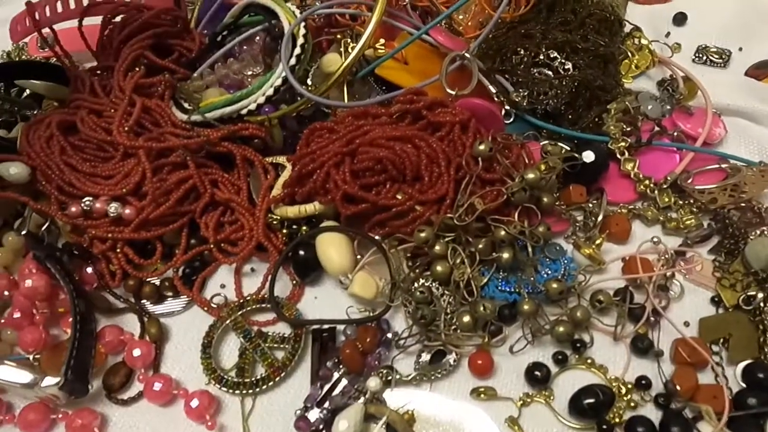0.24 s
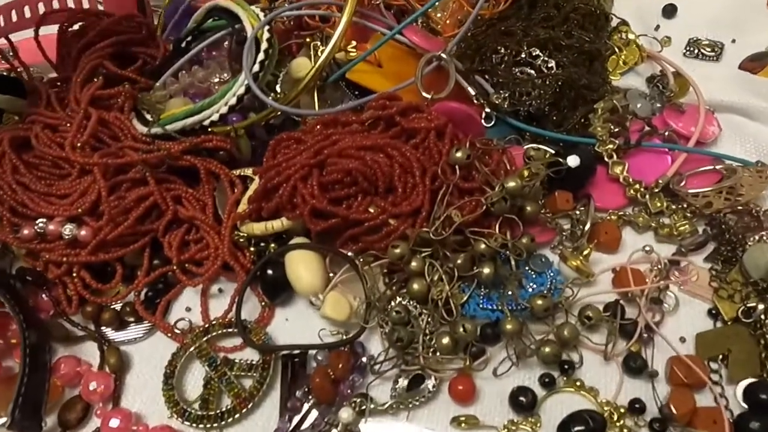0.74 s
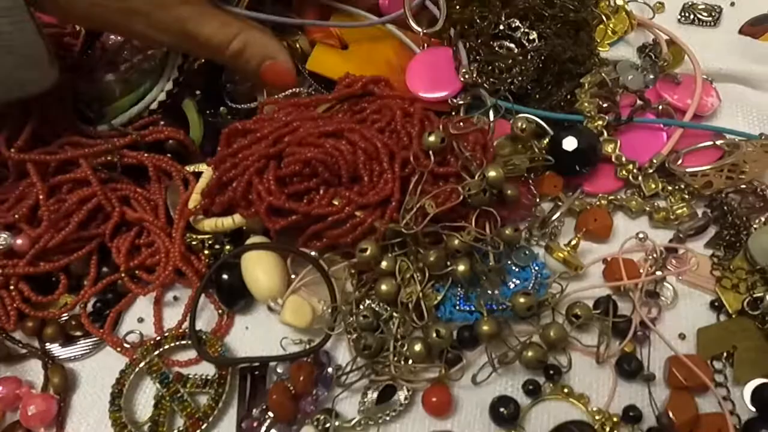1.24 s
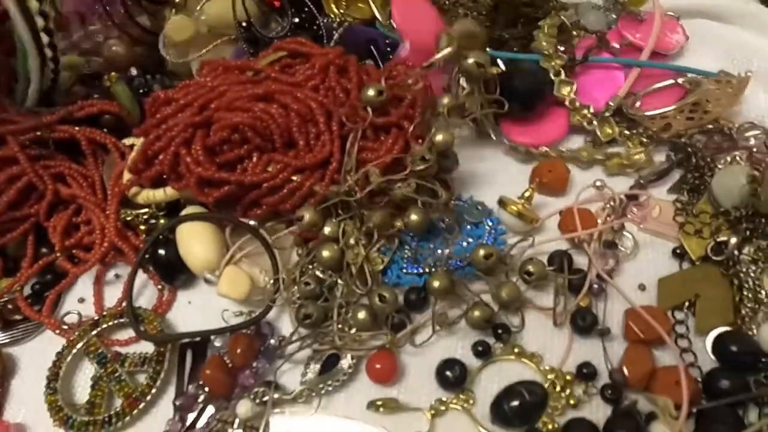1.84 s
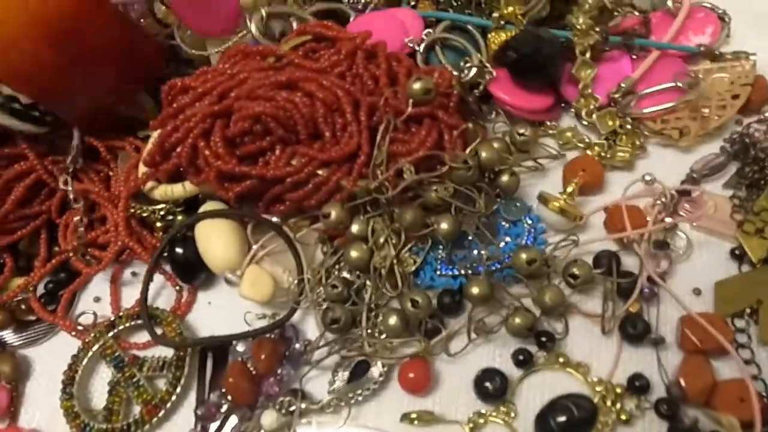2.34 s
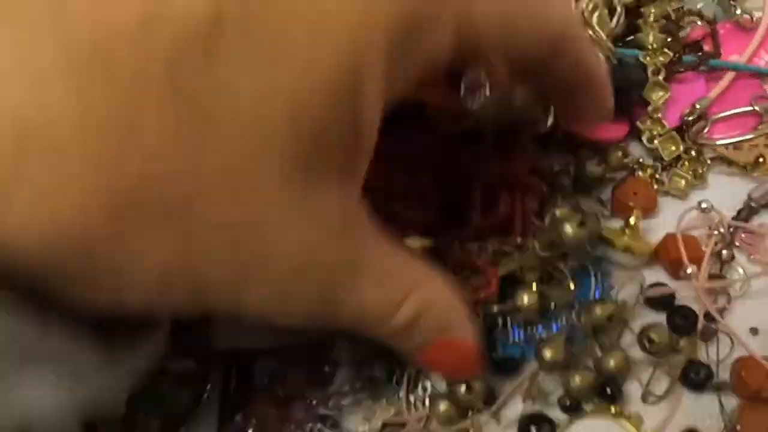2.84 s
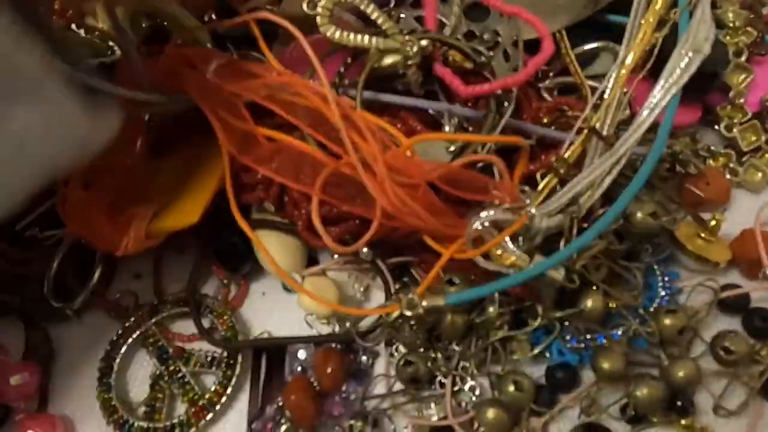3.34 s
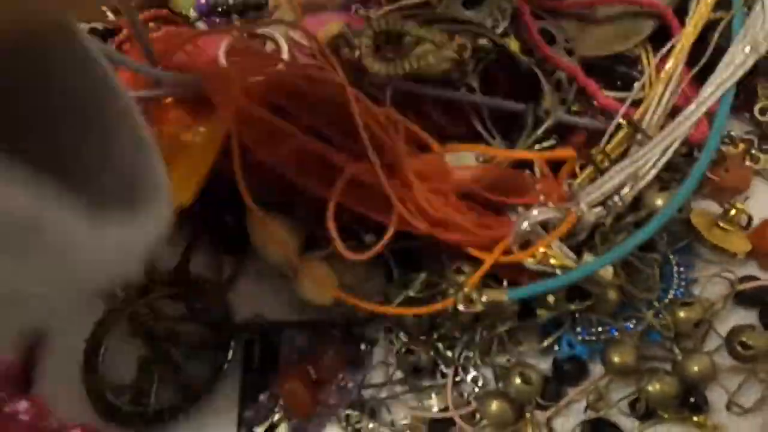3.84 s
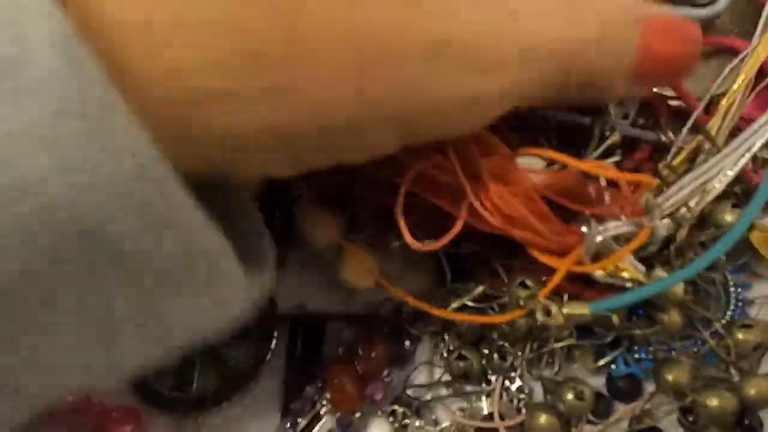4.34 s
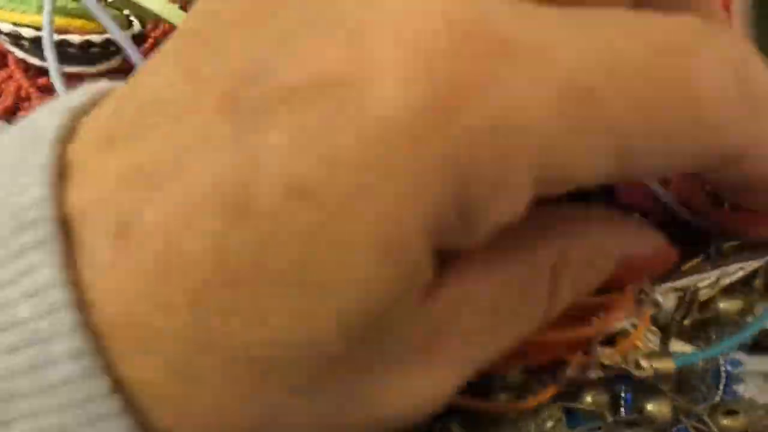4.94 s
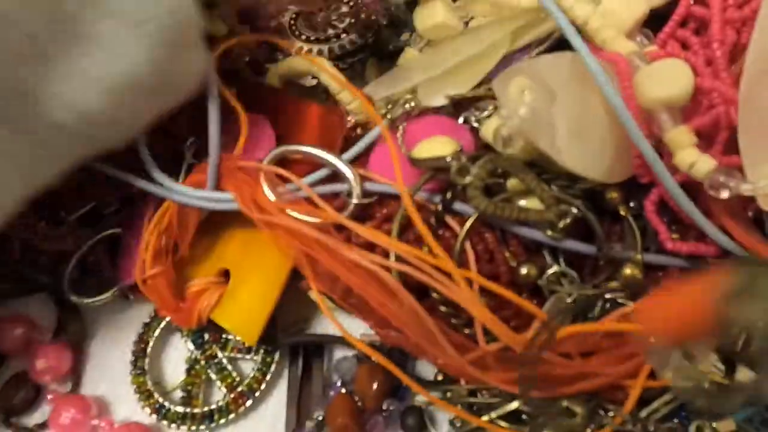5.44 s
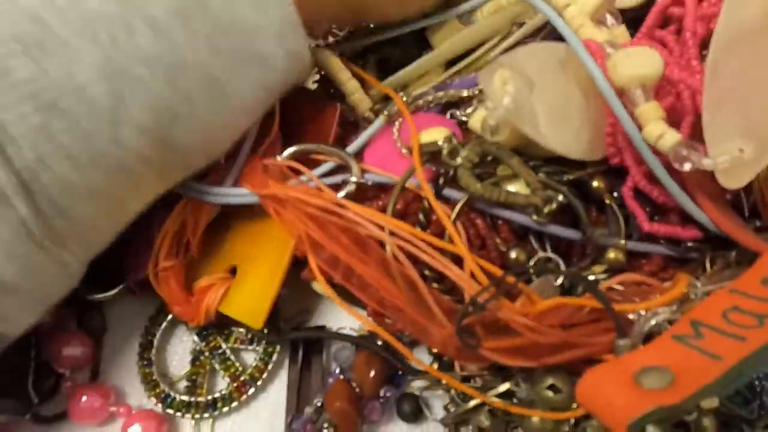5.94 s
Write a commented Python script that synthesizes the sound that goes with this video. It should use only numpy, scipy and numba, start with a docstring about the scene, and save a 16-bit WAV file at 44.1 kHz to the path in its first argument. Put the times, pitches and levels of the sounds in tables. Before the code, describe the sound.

Close-up stereo sound of jewelry being sorted by hand in a room. Irregular short strokes stir chains and strings of seed beads into fine showers of tiny clicks, while cords drag dully. Larger beads snap together; bright metallic chinks come in the first half, a ringing bangle scrape midway, faint charm jingles afterward. The table knocks softly below. Movement eases toward the end, with a few hollow clacks over low room air.

```python
"""First a soft brush of cords and chain with dull bead clicks: a hand rummages in costume jewelry, close up in a room.
Chains and seed beads are showers of tiny collisions, each a noisy tick and short damped modes; cords drag duller.
Large beads click as shaped noise plus a tone; pendant, bangle, hoop, charms and hollow bead ring in decaying modes.
Random catches make the bangle scrape and the shaken charms sing. Short strokes set the rattle, drag and table rumble;
bumps knock the table top. Reflections surround the sources over steady room air."""
import sys
import numpy as np
from scipy import signal
from scipy.fft import rfft, irfft, next_fast_len
from scipy.io import wavfile
from scipy.ndimage import uniform_filter1d
from numba import njit

SR = 44100
rng = np.random.default_rng(int(sys.argv[2]) if len(sys.argv) > 2 else 0)


def generate_wav(signal):
    """Clip the signal to [-1, 1] and save it as 16-bit WAV at the path in sys.argv[1]."""
    frames = np.transpose(np.atleast_2d(signal))
    scaled = np.clip(frames, -1, 1) * 32767
    pcm = np.round(scaled).astype(np.int16)
    wavfile.write(sys.argv[1], SR, pcm)


N = 272979  # length in samples

# Strokes of the hand, each shifting part of the heap; levels come before each layer's trim:
# (start [s], length [s], chain rattle [dB], cord drag [dB], weight on the table [dB])
STROKES = [(0.035, 0.039, -51, -46, -64), (0.16, 0.2, -50, -48, -58), (0.4, 0.077, -46.5, -45, -43.5),
           (0.491, 0.071, -41.5, -40, -38), (0.549, 0.033, -34, -36, -38), (0.66, 0.11, -39.5, -39.5, -41),
           (0.91, 0.069, -51, -49.5, -69), (0.987, 0.15, -38, -54, -53.5), (1.153, 0.13, -40.5, -41.5, -56),
           (1.309, 0.28, -37.5, -47.5, -52), (1.595, 0.2, -39, -48.5, -55),
           (1.811, 0.29, -42, -59.5, -55.5), (2.132, 0.19, -44, -56, -55), (2.342, 0.085, -40, -64, -46.5),
           (2.619, 0.089, -48.5, -50, -50), (2.68, 0.14, -36, -45, -41), (2.797, 0.093, -32, -50.5, -37.5),
           (2.964, 0.25, -40.5, -52.5, -54), (3.378, 0.057, -43, -52.5, -48),
           (3.433, 0.16, -33.5, -38.5, -55), (3.604, 0.06, -33.5, -45, -38.5),
           (3.665, 0.13, -45.5, -61.5, -51.5), (3.989, 0.16, -38.5, -49, -42.5),
           (4.173, 0.38, -48, -60.5, -68), (4.315, 0.045, -36, -47.5, -47.5),
           (4.398, 0.15, -39, -48, -44.5), (4.551, 0.28, -40, -50.5, -47), (4.861, 0.19, -39.5, -50, -46),
           (5.081, 0.063, -35, -53.5, -42.5), (5.234, 0.065, -44.5, -53, -67), (5.332, 0.18, -55, -76, -51),
           (5.495, 0.2, -51, -58, -47.5), (5.771, 0.23, -50, -55, -49), (6.021, 0.063, -51.5, -62.5, -48)]
REST_DB = -74  # faint stirring between strokes, before each layer's trim


def effort(axis, settle_db, attack_s=0.028, tire_db_per_s=12, release_db_per_s=450, settle_db_per_s=105):
    """Level in dB of one stroke column: each takes hold, eases off, stops, and leaves the heap settling."""
    t = np.arange(N) / SR
    power = undb(REST_DB) ** 2
    for row in STROKES:
        start, length = row[:2]
        since = np.maximum(t - start, 0)
        after = np.maximum(since - length, 0)
        push_db = row[axis] - tire_db_per_s * (since - after)
        release = undb(-release_db_per_s * after) + undb(settle_db - settle_db_per_s * after)
        attack = np.minimum(since / attack_s, 1)
        power = power + (attack * undb(push_db) * release) ** 2
    return 10 * np.log10(power)


def stick_slip(per_s=75):
    """The heap catches and gives way: smoothed random steps of rms 1."""
    hold = int(SR / per_s)
    steps = np.repeat(rng.standard_normal(N // hold + 1), hold)[:N]
    return unit(uniform_filter1d(steps, hold // 2))


# Fine metal chain in what moves: (time [s], treble gain relative to the rattle's own treble [dB])
FINE_CHAIN = [(.8, -46), (1.0, -5), (1.6, 5.5), (2.0, 7), (2.85, 2), (3.55, 2), (4.4, -2.5), (5.0, -3.5),
              (5.6, 4.5)]
# Spectrum of the rattle, also of the contact noise on struck pieces: (frequency [Hz], level [dB])
RATTLE_COLOUR = [(500, -24.5), (1500, -7.5), (2300, -1.5), (4500, 6), (7500, 1), (10000, -8.5),
                 (12500, -11), (15500, -30)]


def chains(slip, rattle_db=-3.5, slip_db=2, split_hz=8500, busy_db=-28):
    """One patch of tumbling links and seed beads: a gentle touch moves fewer; fine chain adds sparkle."""
    effort_db = effort(axis=2, settle_db=-13)
    moving_share = undb((effort_db - busy_db) / 2)
    links = collisions(per_s=560, lo_hz=712, hi_hz=15575, t60=.023, tick=0.77, share=moving_share)
    links = steady(colour(links, RATTLE_COLOUR), size=2100)
    highpass = signal.butter(2, split_hz, "high", fs=SR, output="sos")
    treble = signal.sosfiltfilt(highpass, links)
    sparkling = links + (undb(curve(FINE_CHAIN)) - 1) * treble
    return sparkling * undb(effort_db + rattle_db + slip_db * slip)


# Spectrum of the dragging cords: (frequency [Hz], level [dB])
RUB_COLOUR = [(60, -14.5), (200, 6.5), (520, 0.5), (780, -6), (1050, 4), (1500, -4.5), (2200, -1),
              (4000, -28), (10000, -27.5), (15500, -44)]


def rubbing(slip, rub_db=1.5, slip_db=1.5, busy_db=-36):
    """Cords and strings of beads drag over the heap in small dull slips, denser when pulled hard."""
    effort_db = effort(axis=3, settle_db=-14)
    slipping_share = undb((effort_db - busy_db) / 2)
    slips = collisions(per_s=600, lo_hz=79.0, hi_hz=3528, t60=0.047, tick=0.91, share=slipping_share)
    return steady(colour(slips, RUB_COLOUR), size=1800) * undb(effort_db + rub_db + slip_db * slip)


# Clicks of large beads, before the overall trims of level and treble:
# (time [s], level [dB], main resonance [Hz], treble [dB])
CLICKS = [(0.1127, -19.5, 2850, -26), (0.2324, -24, 2450, -20.5), (.411, -26, 2860, -39),
          (.7199, -19.5, 2170, -30), (0.9271, -23, 3000, -27), (1.044, -12, 5200, -13),
          (1.382, -13.5, 5200, -21), (1.4259, -14.5, 5280, -13), (1.4673, -11, 7400, -22),
          (1.509, -18, 2050, -36), (1.5348, -11.5, 4900, -37), (1.5472, -10, 7740, -20),
          (1.6221, -9.5, 9400, -12), (1.7287, -13, 3600, -22), (1.7577, -17, 3600, -15),
          (2.166, -17.5, 6040, -5), (2.499, -24, 3970, -4), (2.833, -14.5, 6960, -1),
          (2.8625, -10.5, 5100, -9), (3.5532, -20, 1460, -20), (3.6144, -10.5, 2500, -12),
          (4.0106, -15.5, 4020, -21), (4.3307, -18.5, 3600, -30), (4.4322, -15, 6600, -21),
          (4.9529, -28, 2090, -33), (5.074, -27, 2800, -27), (5.1015, -18.5, 4270, -24),
          (5.1853, -17.5, 7600, -36), (5.285, -17, 5030, -15), (5.592, -10.5, 6870, -32),
          (6.0275, -19.5, 4370, -15)]
# Ticks of small beads, all of one size, before the overall trim: (time [s], level [dB])
TICKS = [(.062, -38), (.0761, -35), (.2581, -36), (.4485, -24.5), (.6908, -23.5), (.9374, -23),
         (1.0266, -23), (1.1168, -20.5), (1.124, -25), (1.184, -25), (1.371, -20), (1.388, -17.5),
         (1.6735, -21.5), (1.8342, -28), (2.0466, -27), (2.2222, -21.5), (2.569, -32.5), (2.7421, -24),
         (3.325, -29), (3.637, -14.5), (3.6696, -22), (3.7822, -32), (4.1075, -19), (4.3609, -27),
         (4.593, -20), (4.7762, -25), (5.04, -18.5), (5.135, -16.5), (5.2335, -18.5), (5.4615, -33.5),
         (5.5316, -33), (5.8624, -24.5), (5.8738, -38), (5.9323, -27)]
TICK_HZ, TICK_TREBLE_DB = 5050, -20  # main resonance; treble before the trim


def beads(click_db=-8, tone=0.45, rise_s=0.00018, snap=1.8, snap_t60=0.0021, t60=0.015, treble_db=3,
          body_db=-14, settle=0.17, settle_t60=0.059, graze=0.037, graze_s=0.0025):
    """Hard beads graze, snap together, ring for a few milliseconds and shake their neighbours."""
    out, t = np.zeros(N), np.arange(SR // 10) / SR
    small = [(s, db, TICK_HZ, TICK_TREBLE_DB) for s, db in TICKS]
    for s, db, hz, high_db in list(CLICKS) + small:
        shape = snap * fade(t, snap_t60) + fade(t, t60) + settle * fade(t, settle_t60)
        shape *= 1 - np.exp(-t / rise_s)
        low, high = body_db, high_db + treble_db
        points = [(200, low - 8), (1200, low), (hz, 0), (11500, high), (16000, high - 21)]
        crack = unit(colour(rng.standard_normal(len(t)) * shape, points))
        click = crack + tone * unit(np.sin(2 * np.pi * hz * t) * fade(t, t60))
        # the level is that of the first two milliseconds
        click = undb(db + click_db) * click / np.sqrt(np.mean(click[:SR // 500] ** 2))
        add(out, s + 2 * rise_s, click)
        # the graze is a faint copy just ahead
        add(out, s - graze_s * (.5 + rng.random()), graze * click)
    return out


# Clacks of a large hollow bead, before the overall trim: (time [s], level [dB], favoured modes [Hz])
CLACKS = [(.518, -17.5, 5000), (.5335, -12, 5700), (.5378, -8.5, 4600), (.567, -16, 4700),
          (5.7996, -18, 3000), (5.829, -37, 5600), (5.8525, -19.5, 3500), (5.8965, -21.5, 5630),
          (5.9557, -22, 4800)]
# Modes of the hollow bead: (frequency [Hz], relative level [dB], t60 [s])
HOLLOW_BEAD_MODES = [(4320, -1, 0.023), (4840, -4, 0.033), (5550, -1.5, 0.012)]


def hollow_bead():
    """A large hollow bead clacks in three short-lived modes."""
    return struck(CLACKS, HOLLOW_BEAD_MODES, gain_db=-3.0, octaves=0.35, tick=0.79, tick_t60=0.016, pull_hz=27)


# Pendant chinks, before the overall trim:
# (time [s], level [dB], modes favoured by the contact [Hz], ring length [share of the free ring])
CHINKS = [(1.480, -15.5, 7950, 0.54), (1.566, -10.5, 5000, 0.15), (1.572, -9.5, 8900, 0.37),
          (1.729, -13, 3200, 0.17), (1.776, -7, 7300, 0.25), (1.8, -17, 6000, .35),
          (2.2365, -9, 4970, 0.19), (2.2415, -9.5, 8300, 0.6), (2.318, -3.5, 5530, 0.66),
          (2.397, -22, 4850, 0.75)]
# Modes of the pendant: (frequency [Hz], relative level [dB], t60 ringing free [s])
PENDANT_MODES = [(3058, -3, 0.18), (3860, -11, 0.18), (7090, 1.5, 0.05), (7770, 7.5, 0.088),
                 (9740, 4, 0.029), (11600, 3.5, 0.035)]


def pendant():
    """A pendant chinks, its free ring cut short by the heap."""
    return struck(CHINKS, PENDANT_MODES, gain_db=-4, octaves=0.44, tick=0.67, tick_t60=0.0075, pull_hz=19,
                  vary=0.003)


# Bangle knocks, before the overall trim:
# (time [s], level [dB], favoured modes [Hz], ring length [share of the free ring])
BANGLE_KNOCKS = [(2.869, -17.5, 6640, 1), (2.935, -17.5, 1800, 0.72), (2.953, -17, 1500, 0.62),
                 (2.999, -14, 4440, 1), (3.615, -8.5, 4900, 0.22)]
# Scrapes of the bangle:
# (start [s], length [s], level [dB], favoured modes [Hz], pitch bend over the scrape [share])
BANGLE_SCRAPES = [(2.869, 0.16, -41.5, 1800, -.01), (2.997, 0.054, -34, 2930, -.015),
                  (3.069, 0.11, -40, 2000, 0.14)]
# Modes of the bangle: (frequency [Hz], relative level [dB], t60 ringing free [s])
BANGLE_MODES = [(1882, 3, 0.12), (2440, 5, 0.16), (3210, -9.5, 0.24), (4040, -5, 0.25), (4370, 2, 0.14),
                (5210, -2, 0.19), (5600, -13, 0.25), (6220, 1, 0.17), (7630, -0.5, 0.17), (8460, -1, 0.23),
                (10000, -7.5, 0.25)]


def bangle():
    """A bangle rings in many close modes, knocked or kept singing by scraping."""
    knocks = struck(BANGLE_KNOCKS, BANGLE_MODES, gain_db=-8.5, octaves=1.5, tick=0.83, tick_t60=0.027,
                    pull_hz=24)
    return knocks + scraped(BANGLE_MODES, BANGLE_SCRAPES, per_s=310, octaves=0.26)


# Charm jingles, before the overall trim:
# (time [s], level [dB], favoured modes [Hz], ring length [share of the free ring])
JINGLES = [(3.274, -33.5, 14000, 0.9), (4.015, -18.5, 8570, 0.26), (4.069, -20, 6440, 0.45),
           (4.092, -28, 6840, 1), (4.142, -22.5, 5460, 0.21), (4.648, -26.5, 8200, 1),
           (4.690, -27, 6750, 0.55), (5.194, -23.5, 8600, 0.1), (5.359, -22.5, 8950, 0.27)]
# Charms shaken along with the heap:
# (start [s], length [s], level [dB], favoured modes [Hz], pitch bend over the shake [share])
CHARM_SHAKES = [(4.012, .15, -44.5, 6000, .005), (4.312, 0.35, -50.5, 7500, -.02)]
# Modes of a charm: (frequency [Hz], relative level [dB], t60 ringing free [s])
CHARM_MODES = [(4360, 9.5, 0.2), (4950, -5, 0.22), (7150, -1, 0.096), (8670, -2.5, 0.22), (9980, 1, 0.076),
               (11970, 7, 0.036)]


def charms():
    """Small charms jingle when struck, and shimmer under sparse catches when shaken."""
    jingles = struck(JINGLES, CHARM_MODES, gain_db=-3.0, octaves=0.4, tick=0.66, tick_t60=0.021, pull_hz=42,
                     vary=0.0078)
    return jingles + scraped(CHARM_MODES, CHARM_SHAKES, per_s=70, octaves=0.91)


# Pings of a small earring hoop, before the overall trim: (time [s], level [dB], favoured modes [Hz])
PINGS = [(.975, -26.5, 8500), (2.2965, -10.5, 8650)]
# Modes of the hoop: (frequency [Hz], relative level [dB], t60 [s])
HOOP_MODES = [(7660, -5, .05), (8520, -4, 0.047), (11300, -7, .03)]


def hoop():
    """A small hoop pings in three high modes."""
    return struck(PINGS, HOOP_MODES, gain_db=-4, octaves=.6, tick=0.74, tick_t60=0.014, pull_hz=30, vary=.004)


# Bumps on the table, before the overall trim: (time [s], level [dB], pitch of the push [Hz])
BUMPS = [(.450, -27, 724), (.570, -31, 503), (.586, -26, 480), (.702, -23.5, 450), (.720, -32, 650),
         (.757, -36, 740), (1.174, -29.5, 850), (1.187, -26.5, 895), (1.511, -29, 490), (2.006, -36.5, 273),
         (2.737, -24, 262), (2.766, -22, 295), (3.485, -26.5, 408), (4.019, -31, 205), (4.426, -29, 350),
         (4.692, -34, 600), (4.760, -26, 380), (5.015, -31, 620), (5.102, -34.5, 710)]
# Modes of the table top: (frequency [Hz], relative level [dB], t60 [s])
TABLE_MODES = [(81.6, 3, 0.27), (178, 2, 0.034), (279, 1.5, 0.037), (486, -6, 0.062), (610, -2, 0.023),
               (1065, 4, 0.018)]
# Spectrum of the table's rumble: (frequency [Hz], level [dB])
RUMBLE_COLOUR = [(12, -20), (27, 2), (40, -3), (65, -9.5), (220, -12.5), (600, -32), (8000, -64)]


def table(slip, rumble_db=-1.5, slip_db=2):
    """The table knocks under bumps and sways under the hand's weight."""
    knocks = struck(BUMPS, TABLE_MODES, gain_db=4.5, octaves=0.84, tick=0.37, tick_t60=0.012, pull_hz=12.5,
                    vary=0.026)
    sway = steady(colour(rng.standard_normal(N), RUMBLE_COLOUR), size=4000)
    weight_db = effort(axis=4, settle_db=-5.0)
    return knocks + sway * undb(weight_db + rumble_db + slip_db * slip)


# Spectrum of the room air: (frequency [Hz], level [dB])
ROOM_COLOUR = [(25, -12), (100, -8.5), (250, 4.5), (420, -4), (780, -24), (1100, -13), (4500, -23),
               (8000, -27.5), (14000, -46)]


def room_tone(floor_db=-54, width=0.33):
    """A low steady rush of room air, nearly alike at both ports."""
    mid, side = (unit(colour(rng.standard_normal(N), ROOM_COLOUR)) for _ in range(2))
    return undb(floor_db) * np.array([mid + width * side, mid - width * side])


def room(x, near_db=-12, near_t60=0.19, far_db=-26, far_t60=.36):
    """Quick reflections off the heap and a faint tail from the walls, different for each place and port."""
    t = np.arange(SR // 2) / SR
    out = []
    for _ in range(2):
        near = unit(rng.standard_normal(len(t)) * fade(t, near_t60))
        far = unit(rng.standard_normal(len(t)) * fade(t, far_t60))
        echo = (undb(near_db) * near + undb(far_db) * far) / np.sqrt(len(t))
        echo = colour(echo, [(100, -20), (1000, 0), (5000, -2), (12000, 2)])
        out.append(x + signal.fftconvolve(x, echo)[:N])
    return np.array(out)


def placed(x, pan_db):
    """A source in the room, louder at the left port by pan_db."""
    return room(x) * undb(np.array([[pan_db], [-pan_db]]) / 2)


def struck(blows, modes, gain_db, octaves, tick, tick_t60, pull_hz, vary=0, rise_s=0.00088):
    """Blows on a piece: contact favours some modes, the heap may damp the ring, vary [share] detunes each mode."""
    out, t = np.zeros(N), np.arange(SR // 2) / SR
    for s, db, contact_hz, *free in blows:
        ring = 0
        for (hz, _, t60), weight in zip(modes, favoured(modes, contact_hz, octaves)):
            phase = wavering(hz * (1 + vary * rng.standard_normal()), pull_hz, len(t))
            decay = fade(t, t60 * np.prod(free))  # no share given: rings free
            ring = ring + rng.choice([-1, 1]) * weight * np.sin(phase) * decay
        contact = tick * rng.standard_normal(len(t)) * fade(t, tick_t60) * (1 - np.exp(-t / rise_s))
        add(out, s, undb(db + gain_db) * (ring + colour(contact, RATTLE_COLOUR)))
    return out


def scraped(modes, drags, per_s, octaves, free=.25, pull_hz=28):
    """Uneven catches keep a dragged piece's modes singing, at a share of the free ring, while its pitch bends."""
    out, t = np.zeros(N), np.arange(SR) / SR
    for s, length, db, contact_hz, bend in drags:
        along = np.minimum(t / length, 1)
        caught = rng.random(SR) < per_s / SR
        catches = 2 * np.sqrt(along * (1 - along) * SR / per_s) * caught
        for (hz, _, t60), weight in zip(modes, favoured(modes, contact_hz, octaves)):
            keep = fade(1 / SR, t60 * free)  # amplitude kept from sample to sample
            kicks = catches * (rng.standard_normal(SR) + 1j * rng.standard_normal(SR))
            ring = signal.lfilter([np.sqrt(1 - keep ** 2)], [1, -keep], kicks)
            phase = wavering(hz * (1 + bend * along), pull_hz, SR)
            add(out, s, undb(db) * weight * np.real(ring * np.exp(1j * phase)))
    return out


def wavering(hz, pull_hz, size):
    """Phase of a mode whose pitch is pulled about a little by touching neighbours."""
    pull = pull_hz * unit(uniform_filter1d(rng.standard_normal(size), size=700))
    return 2 * np.pi * np.cumsum(hz + pull) / SR


def favoured(modes, contact_hz, octaves):
    """Weights of the modes, of total power 1: the point of contact favours those near contact_hz."""
    hz, db, _ = np.transpose(modes)
    weight = undb(db) / (1 + (np.log2(hz / contact_hz) / octaves) ** 2)
    return weight / np.linalg.norm(weight)


@njit
def grains(start, hz, t60, size, length):
    """Each collision rings a few short damped modes."""
    out = np.zeros(length)
    for k in range(len(start)):
        for m in range(hz.shape[1]):
            pole = np.exp(2j * np.pi * hz[k, m] / SR - np.log(1000) / (t60[k] * SR))
            z = size[k] + 0j
            for i in range(start[k], min(length, start[k] + int(t60[k] * SR))):
                out[i] += z.imag
                z *= pole
    return out


def collisions(per_s, lo_hz, hi_hz, t60, tick, share, spread_db=4.2):
    """Random contacts, many faint and a few strong: a broad tick and a brief ring; share thins them over time."""
    chance = rng.random((int(per_s * N / SR), 11))
    start = (chance[:, 0] * N).astype(np.int64)
    rings = t60 * np.exp(2 * chance[:, 1] - 1)
    size = undb(spread_db * np.minimum(-np.log(1 - chance[:, 2]), 4))
    size *= np.where(chance[:, 3] < share[start], 1, .04)  # the rest barely touch
    hz = lo_hz + (min(hi_hz, SR / 2) - lo_hz) * chance[:, 4:]
    hz *= rng.choice([-1, 1], hz.shape)  # each mode starts either way
    # every tick is a burst of about a millisecond
    contact = signal.lfilter([1], [1, -np.exp(-1 / (.0004 * SR))], np.bincount(start, size, N))
    ringing = unit(grains(start, hz, rings, size / np.sqrt(rings), N))
    return ringing + tick * unit(contact * rng.standard_normal(N))


def steady(x, size):
    """Even out slow swells, so that the hand and its slips set the level."""
    return x / np.sqrt(uniform_filter1d(x ** 2, size=size) + 1e-6 * np.mean(x ** 2))


def undb(db):
    """Decibels to gain."""
    return 10 ** (np.asarray(db) / 20)


def unit(x):
    """Scale to rms 1."""
    return x / np.sqrt(np.mean(x ** 2))


def curve(points, axis=1):
    """One column of a table, joined by straight lines in time."""
    rows = np.array(points)
    return np.interp(np.arange(N) / SR, rows[:, 0], rows[:, axis])


def over_bins(points, size):
    """(Hz, value) points spread over the bins of a transform, on a log-frequency axis."""
    hz, value = np.transpose(points)
    return np.interp(np.log(np.fft.rfftfreq(size, 1 / SR) + 1), np.log(hz), value)


def colour(x, points):
    """Causal filter with the given (Hz, dB) response, so attacks stay sharp."""
    size = next_fast_len(len(x)) * 2
    # folding the cepstrum forward in time gives minimum phase
    cepstrum = irfft(np.log(undb(over_bins(points, size))))
    cepstrum[1:size // 2] *= 2
    cepstrum[size // 2 + 1:] = 0
    return irfft(rfft(x, size) * np.exp(rfft(cepstrum)))[:len(x)]


def fade(t, t60):
    """Exponential decay, 60 dB down at t60."""
    return np.exp(-np.log(1000) * t / max(t60, 1e-4))


def add(out, s, sound):
    """Mix a sound in at time s."""
    start = max(int(s * SR), 0)
    out[..., start:start + len(sound)] += sound[:N - start]


def scene():
    """Everything the hand stirs, with the table and the room air."""
    slip = stick_slip()
    links = placed(chains(slip), pan_db=3.5) + placed(chains(slip), pan_db=-5.5)
    cords = room(rubbing(slip))
    clicks = placed(beads() + hollow_bead(), pan_db=-1.5)
    metal = placed(pendant() + hoop(), pan_db=1.5)
    metal = metal + placed(bangle(), pan_db=-3.0) + placed(charms(), pan_db=-2.5)
    return links + cords + clicks + metal + room(table(slip)) + room_tone()


# Phase between the two microphone ports: (frequency [Hz], lead of the left [radians])
PORT_PHASE = [(350, 0), (1100, -.75), (4000, -.35), (14000, -.6)]
# Level between the two ports: (frequency [Hz], left minus right [dB])
PORT_BALANCE = [(600, 0.28), (1900, -1.34), (4400, 0.21), (8000, 1)]


def record(dry, top_hz=15700):
    """Two close ports hear slightly different phase and level; the top is cut steeply."""
    size = 2 * next_fast_len(N)
    # half the difference goes to each port
    half = undb(over_bins(PORT_BALANCE, size) / 2) * np.exp(.5j * over_bins(PORT_PHASE, size))
    ports = irfft(rfft(dry, size) * np.array([half, 1 / half]))[:, :N]
    return signal.sosfilt(signal.ellip(8, .2, 80, top_hz, fs=SR, output="sos"), ports)


dry = scene()
out = record(dry)
generate_wav(out)
```